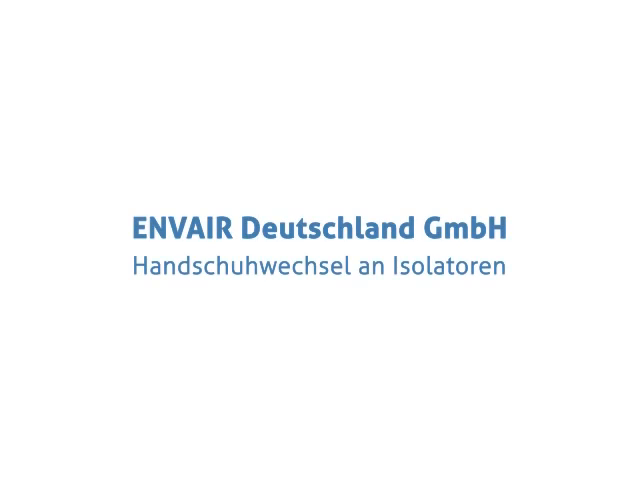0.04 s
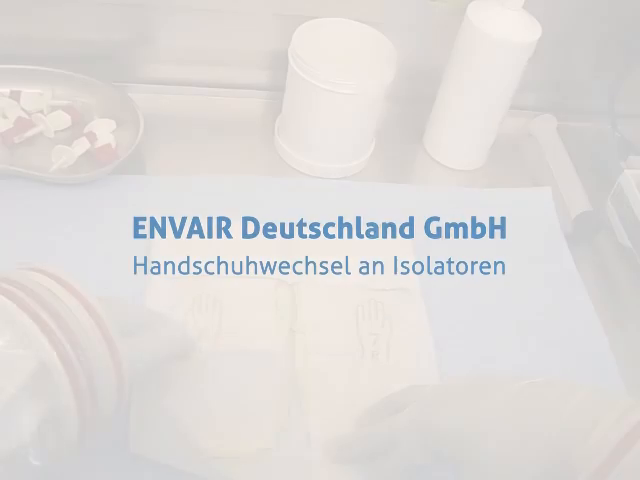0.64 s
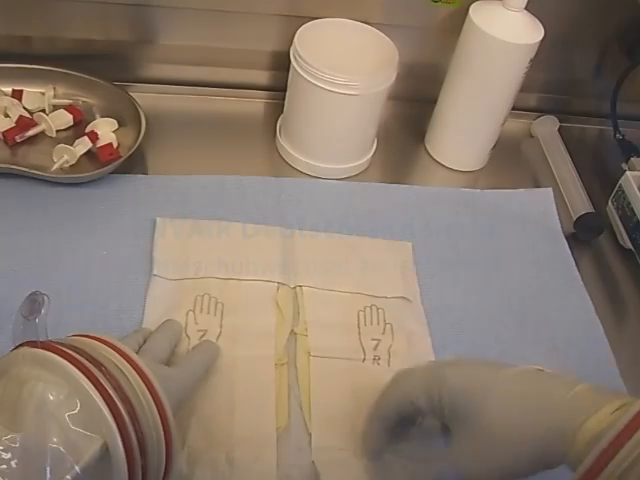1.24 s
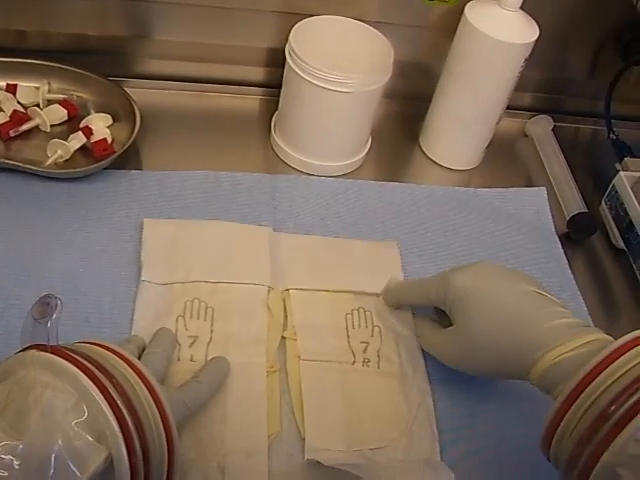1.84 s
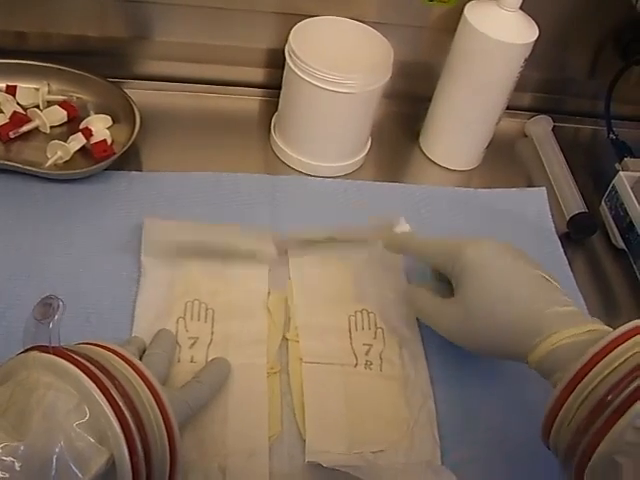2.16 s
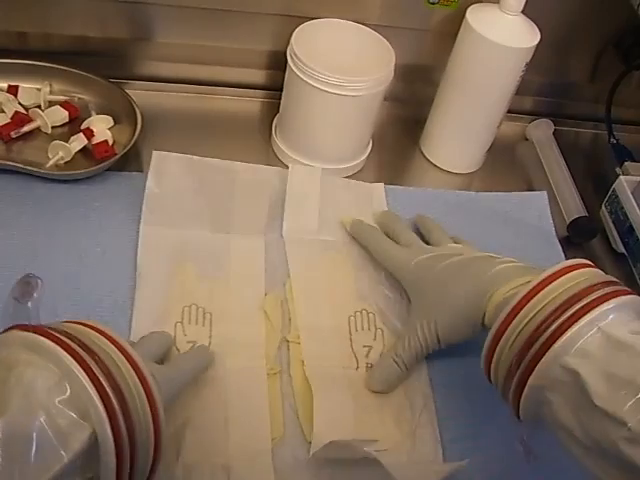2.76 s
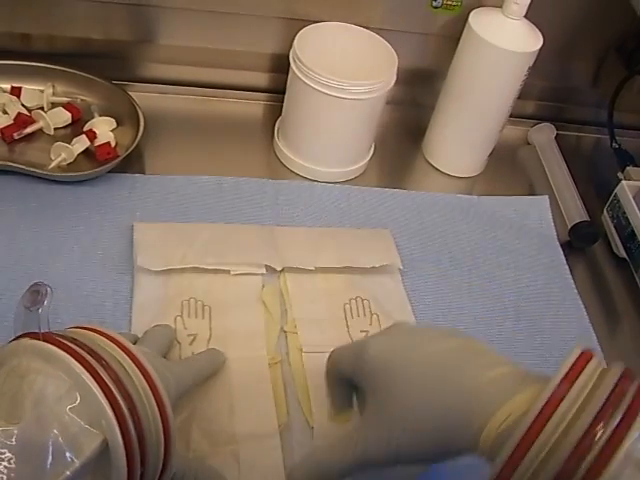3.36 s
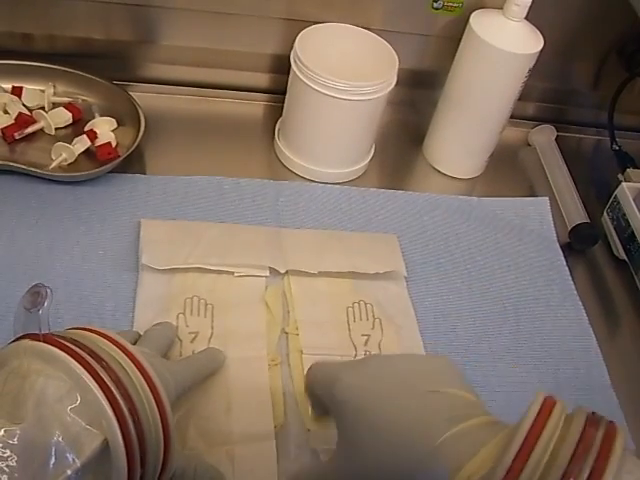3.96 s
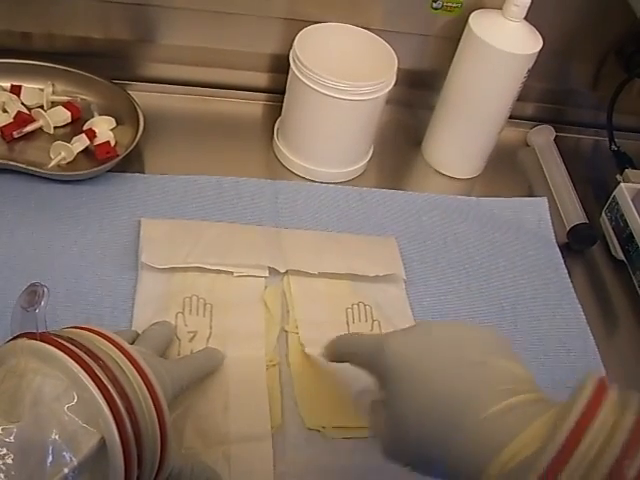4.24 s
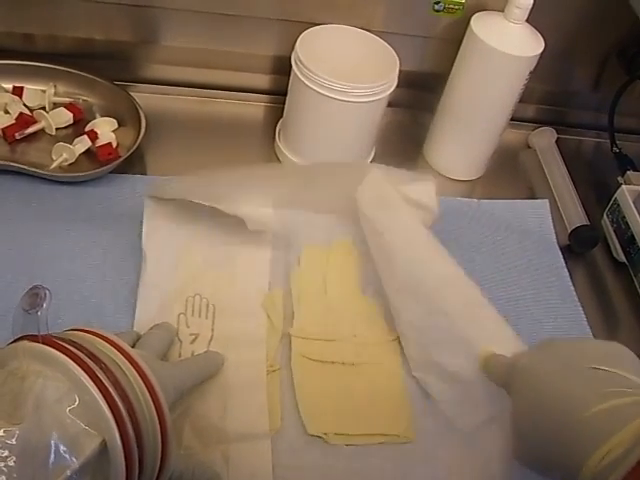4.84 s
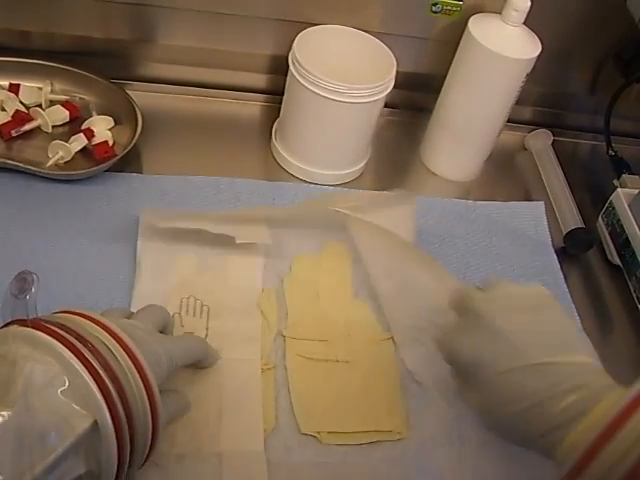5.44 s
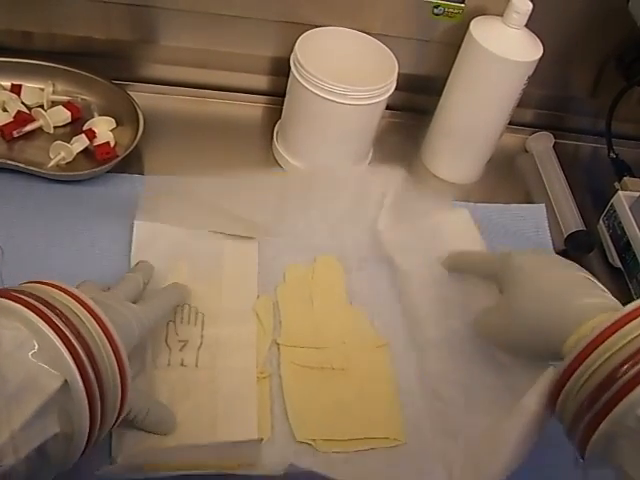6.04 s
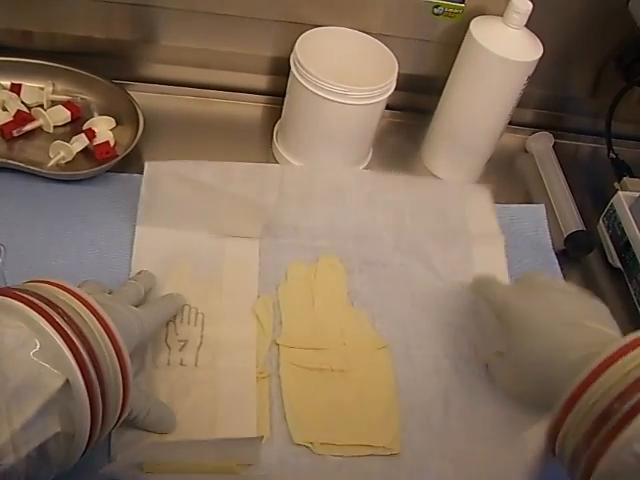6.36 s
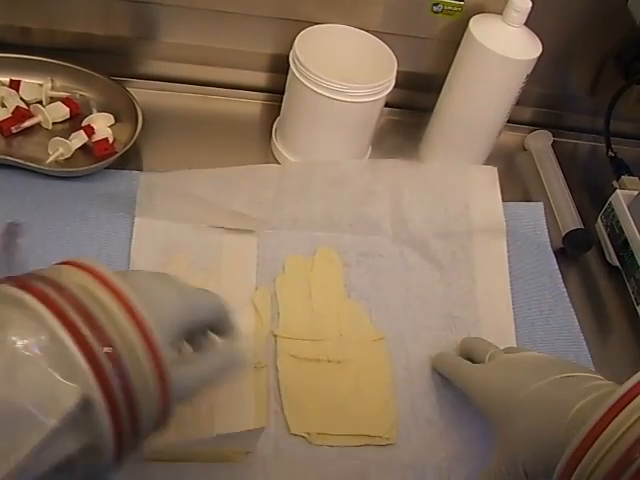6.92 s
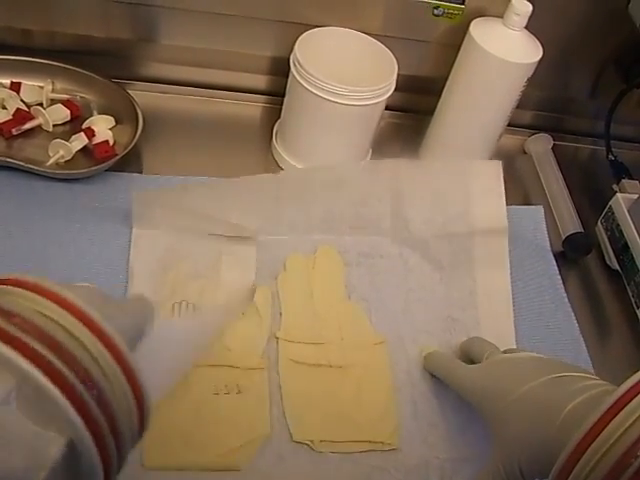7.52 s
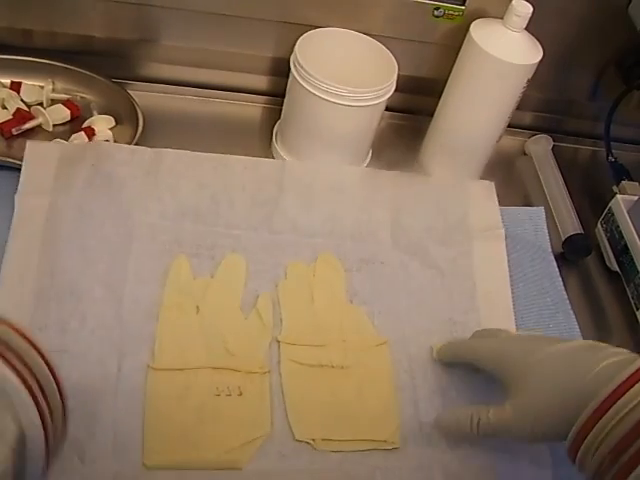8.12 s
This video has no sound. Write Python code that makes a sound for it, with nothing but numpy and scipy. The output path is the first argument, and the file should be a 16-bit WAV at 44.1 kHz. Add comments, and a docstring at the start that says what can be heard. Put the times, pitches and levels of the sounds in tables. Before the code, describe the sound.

Ventilation fans drone inside a steel chamber while a paper wrapper is opened with crinkles and sharp snaps.

```python
"""After 0.35 s of silence a small camera switches in and fades up inside a steel glove box.
Ventilation runs throughout: air rushes through the filters over a hum of motor and fan tones.
A rubber fingertip squeaks twice as gloved hands take hold of a stiff, rustling paper wrapper.
From 1.3 to 2.7 s its panels buckle in quick snaps, the hardest overloading the camera; sleeves bump softly.
After a lull the unfolding goes on from 4.2 s, with sparser snaps and one more bump."""
import sys
import numpy as np
from scipy import signal
from scipy.fft import rfft, irfft
from scipy.io import wavfile
from scipy.ndimage import uniform_filter1d

SR = 44100
rng = np.random.default_rng(int(sys.argv[2]) if len(sys.argv) > 2 else 0)


def bounce(signal):
    """Save signal as a 16-bit WAV file at the path given by the first command-line argument."""
    frames = np.transpose(np.atleast_2d(signal))
    limited = np.clip(frames, -1, 1)
    pcm = np.round(limited * 32767).astype(np.int16)
    wavfile.write(sys.argv[1], SR, pcm)


N = 361179
TIME = np.arange(N) / SR


def undb(db):
    """Decibels to gain."""
    return 10 ** (np.asarray(db) / 20)


def unit(x):
    """Scale to rms 1."""
    return x / np.sqrt(np.mean(x ** 2))


def swell(mid_s, half_s):
    """Bell-shaped envelope, peak 1."""
    return np.exp(-2 * ((TIME - mid_s) / half_s) ** 2)


def wander(rate_hz):
    """Random steps, smoothed twice; spread near 1."""
    hold = int(SR / rate_hz)
    steps = np.repeat(rng.standard_normal(N // hold + 1), hold)
    return 1.62 * uniform_filter1d(uniform_filter1d(steps, hold), hold)[:N]


def colour(x, outline, resonances=()):
    """Minimum-phase filter from an (f/Hz, level/dB) outline and optional resonant lifts."""
    size = 16384
    bins_hz = np.maximum(np.fft.rfftfreq(size, 1 / SR), 1)
    hz, db = np.transpose(outline)
    shape_db = np.interp(np.log(bins_hz), np.log(hz), db)
    for centre_hz, width_hz, lift_db in resonances:
        shape_db += lift_db / (1 + (2 * (bins_hz - centre_hz) / width_hz) ** 2)
    cepstrum = irfft(np.log(undb(shape_db)))
    cepstrum[1:size // 2] *= 2
    cepstrum[size // 2 + 1:] = 0
    impulse = irfft(np.exp(rfft(cepstrum)))
    return signal.fftconvolve(x, impulse)[:N]


# rushing air: f/Hz, relative level/dB
AIR_SPECTRUM = [(22, -53.5), (30, -45), (52, -19.5), (66, -9.5), (140, -4.5), (210, -4), (450, -1.5),
                (650, -1), (1000, -8), (1600, -17), (3000, -31), (5000, -41), (7000, -41), (10500, -50.5),
                (14000, -55.5)]
# standing waves of chamber and ducts: f/Hz, width/Hz, lift/dB
CHAMBER_MODES = [(180, 13, -0.5), (196, 11.5, 6), (221.4, 20, 7.5), (295, 22, 6), (391, 8, 2),
                 (505, 34, 1.5), (640, 48, 4.5), (793, 23, 4)]


def airflow(level_db=-15, surge_db=0.57, eddy_db=0.08):
    """Turbulent air excites the chamber's standing waves; it surges slightly and eddies stir it."""
    air = unit(colour(rng.standard_normal(N), AIR_SPECTRUM, CHAMBER_MODES))
    return air * undb(level_db + surge_db * wander(0.86) + eddy_db * wander(14))


# fan and motor tones: f/Hz, level/dB
FAN_TONES = [(32.5, -46), (100.0, -27.5), (174.2, -26.5), (197.0, -36.5), (200.0, -28), (232.5, -33.5),
             (400.2, -30.5), (500.2, -25), (589.2, -31.5), (625.2, -39), (674.8, -32), (800.5, -32.5),
             (826.5, -33.5), (1000.8, -35.5)]


def fans(waver_db=1.32, drift_rad=0.27):
    """Motor and blade tones; strength and phase waver a little in the moving air."""
    hum = 0
    for hz, db in FAN_TONES:
        amplitude = np.sqrt(2) * undb(db + waver_db * wander(6))
        drift = drift_rad * wander(4)
        hum += amplitude * np.sin(2 * np.pi * (hz * TIME + rng.random()) + drift)
    return hum


# hand movements on the paper: t/s, half length/s, level/dB
HAND_MOVES = [(0.418, 0.12, -30), (1.35, 0.19, -25), (1.662, .08, -22.5), (2.27, 0.14, -20.5),
              (2.599, 0.21, -25.5), (3.049, .2, -28.5), (4.321, .14, -28), (4.843, .14, -24.5),
              (5.187, .1, -26), (5.779, .45, -26), (6.651, 0.44, -28.5), (7.85, 0.56, -24)]


def handling(resting_db=-33):
    """Effort on the paper, as rustle gain: each movement swells above the grip of resting hands."""
    moving_power = sum((undb(db) * swell(mid_s, half_s)) ** 2 for mid_s, half_s, db in HAND_MOVES)
    return np.sqrt(undb(resting_db) ** 2 + moving_power)


# rustling sheet: f/Hz, relative level/dB
RUSTLE_SPECTRUM = [(25, -56), (100, -17), (300, 3.5), (600, 5), (1000, 4.5), (1800, -4.5), (3000, -18),
                   (5500, -26), (10000, -33), (15000, -52)]


def rustle(effort, grains_per_s=600, spread_db=3.5, slide_gain=0.47):
    """Many tiny buckles of uneven size, over the hiss of glove sliding on paper."""
    sizes = undb(spread_db * np.minimum(rng.exponential(size=N), 4))
    grains = (rng.random(N) < grains_per_s / SR) * sizes * rng.choice([-1, 1], N)
    hiss = slide_gain * rng.standard_normal(N)
    return effort * unit(colour(unit(grains) + hiss, RUSTLE_SPECTRUM))


# fingertip slips: t/s, half length/s, level/dB
SLIPS = [(0.353, 0.019, -27.5), (0.431, 0.018, -33.5)]
# squeak resonances: f/Hz, width/Hz, relative level/dB
SLIP_MODES = [(1770, 130, 8), (5940, 360, -18), (9600, 600, -26), (14400, 600, -26)]


def squeaks():
    """A rubber fingertip slips briefly and excites a few narrow resonances."""
    friction = rng.standard_normal(N)
    ring = 0
    for hz, width_hz, db in SLIP_MODES:
        resonator = signal.iirpeak(hz, hz / width_hz, fs=SR)
        ring += undb(db) * unit(signal.lfilter(*resonator, friction))
    return ring * sum(undb(db) * swell(mid_s, half_s) for mid_s, half_s, db in SLIPS)


def crinkles(effort, rate_per_s=45, reference_db=-25, scatter_db=4, scatter_oct=0.24):
    """Small random buckles, more frequent the harder the paper is worked; rows as in LOUD_BUCKLES."""
    activity = (effort ** 2 - effort.min() ** 2) / undb(reference_db) ** 2
    count_due = np.cumsum(rate_per_s * activity) / SR
    draws = rng.standard_normal((400, 5))
    thresholds = np.cumsum((draws[:, 0] ** 2 + draws[:, 1] ** 2) / 2)  # exponential gaps
    buckles = []
    for threshold, (size, pitch, sharpness) in zip(thresholds, draws[:, 2:]):
        if threshold < count_due[-1]:
            start_s = np.searchsorted(count_due, threshold) / SR
            panel_db = -21.5 + scatter_db * size
            panel_hz = 600 * 2 ** (scatter_oct * pitch)
            crack_db = -43.5 + scatter_db * sharpness
            buckles.append((start_s, panel_db, panel_hz, crack_db))
    return buckles


# loudest paper buckles: t/s, relative panel level/dB, panel f/Hz, relative crack level/dB
LOUD_BUCKLES = [(.46, -24, 710, -34.5), (1.305, -7, 780, -26.5), (1.326, -7, 557, -32.5),
                (1.357, -4, 950, -26), (1.413, -5.5, 600, -29.5), (1.427, -19, 530, -34),
                (1.454, -9.5, 680, -30.5), (1.639, -8.5, 704, -28), (1.657, -8.5, 570, -30.5),
                (1.697, -28, 930, -27), (1.713, -29, 710, -34), (2.0, -11.5, 670, -36),
                (2.079, -10, 676, -32), (2.084, -10.5, 880, -34), (2.132, -6.5, 670, -30.5),
                (2.22, -5.5, 670, -35), (2.246, 1.5, 670, -24), (2.267, -9, 646, -36),
                (2.303, -7.5, 800, -30.5), (2.316, -7, 675, -40), (2.327, -15, 530, -33),
                (2.456, -5, 467, -30), (2.512, -18, 663, -30), (2.59, -15, 640, -28.5),
                (2.64, -10, 629, -30.5), (2.704, -7, 910, -21), (2.708, -6, 435, -39),
                (4.192, -17, 610, -30.5), (4.331, -17.5, 600, -34), (4.773, -14, 606, -33.5),
                (4.907, -15, 980, -32.5), (5.091, -5, 594, -32), (5.256, -12, 1031, -39),
                (5.522, -17.5, 607, -33), (5.595, -18, 622, -36), (5.673, -13, 600, -29),
                (5.721, -24, 560, -34), (6.102, -5, 1370, -22), (6.363, -15, 600, -32.5),
                (6.877, -25.5, 632, -35), (6.965, -24, 523, -32.5), (7.041, -7, 670, -30),
                (7.921, -7.5, 890, -37)]
# cracking crease: f/Hz, gain/dB
CRACK_SPECTRUM = [(40, -38), (300, -60), (1000, 10), (1900, 8.5), (3100, -0.5), (5500, -10), (7000, -15),
                  (10000, -20), (15000, -26.5)]


def snaps(buckles, ring_cycles=1.76, glide=0.26, crack_s=0.0023, give_s=0.0003,
          panel_gain_db=9.5, crack_gain_db=2.0, break_gain=0.36):
    """A crease gives with one sharp break and fibre ticks; the panel flips and rings, sinking in pitch."""
    t = TIME[:SR // 25]
    attack = 1 - np.exp(-t / give_s)
    strain = attack * np.exp(-t / crack_s)
    sharp_break = break_gain * unit(1.0 * (strain == strain.max()))
    panels, cracks = np.zeros((2, N + len(t)))
    for start_s, panel_db, hz, crack_db in buckles:
        start = int(start_s * SR)
        span = slice(start, start + len(t))
        decay = np.exp(-hz * t / ring_cycles)
        cycles = np.cumsum(hz * (1 + glide * (2 * decay - 1))) / SR
        ring = attack * decay * np.sin(2 * np.pi * cycles)
        panels[span] += undb(panel_db + panel_gain_db) * ring * rng.choice([-1, 1])
        fibres = unit(rng.choice([-1, 1], len(t)) * strain)
        cracks[span] += undb(crack_db + crack_gain_db) * unit(fibres + sharp_break)
    bass_cut = signal.butter(2, 120, "highpass", fs=SR)  # an open sheet radiates almost no bass
    return signal.lfilter(*bass_cut, panels[:N]) + colour(cracks[:N], CRACK_SPECTRUM)


def steel_walls(direct, t60_s=0.1, gap_s=0.003, wet_db=-7, cutoff_hz=2500):
    """Add dense, quick reflections from the close walls, duller than the direct sound."""
    t = TIME[:SR // 3]
    echoes = rng.standard_normal(len(t)) * undb(-60 * t / t60_s) * (t > gap_s)
    echoes = signal.lfilter(*signal.butter(1, cutoff_hz, fs=SR), echoes / np.linalg.norm(echoes))
    return direct + undb(wet_db) * signal.fftconvolve(direct, echoes)[:N]


# sleeve bumps: t/s, half length/s, f/Hz, level/dB
SLEEVE_BUMPS = [(1.3, .12, 56, -37), (1.43, .14, 55.3, -32), (1.4, .16, 36, -36), (2.14, .16, 56.4, -34),
                (2.7, .12, 57, -44), (5.923, 0.054, 93, -23)]


def sleeves():
    """Arms shift in their ports; the sleeves push on the enclosed air in soft, low swells."""
    bumps = 0
    for mid_s, half_s, hz, db in SLEEVE_BUMPS:
        tone = np.sqrt(2) * np.sin(2 * np.pi * (hz * TIME + rng.random()))
        bumps += undb(db) * swell(mid_s, half_s) * tone
    return bumps


def scene():
    """Ventilation, paper, gloves and sleeves in the closed chamber; mono."""
    ventilation = airflow() + fans()
    bumps = sleeves()
    effort = handling()
    hands = rustle(effort) + squeaks() + snaps(LOUD_BUCKLES + crinkles(effort))
    return (ventilation + steel_walls(hands) + bumps)[None]


# camera fade-up: t/s, gain/dB
FADE_UP = [(.35, -7.5), (.6, -5.5), (.9, -4.5), (1.25, -3.5)]
# three fixed gaps in the treble, near 4, 8 and 12 kHz: f/Hz, width/Hz
TREBLE_GAPS = [(4000, 1350), (8030, 980), (12020, 1630)]
SWITCH_ON_S, CEILING, TOP_HZ = 0.354, 0.92, 15500


def record(dry):
    """The camera switches in, fades up and rounds off peaks. The tone is slightly hollow, its top cut."""
    gate = np.clip((TIME - SWITCH_ON_S) / 0.001, 0, 1)
    fade_db = np.interp(TIME, *np.transpose(FADE_UP))
    faded = dry * undb(fade_db) * gate
    out = faded / (1 + (faded / CEILING) ** 12) ** (1 / 12)  # soft clip
    for hz, width_hz in TREBLE_GAPS:
        edges_hz = [hz - width_hz / 2, hz + width_hz / 2]
        out = signal.sosfilt(signal.butter(3, edges_hz, "bandstop", fs=SR, output="sos"), out)
    return signal.sosfilt(signal.ellip(10, 0.1, 80, TOP_HZ, fs=SR, output="sos"), out)


dry = scene()
out = record(dry)
bounce(out)
```